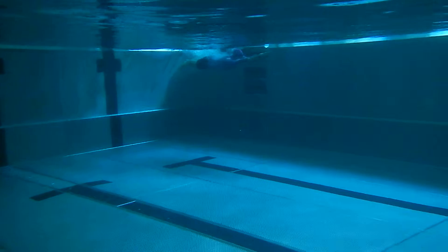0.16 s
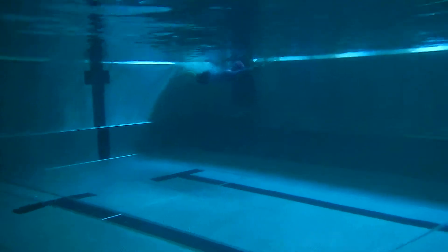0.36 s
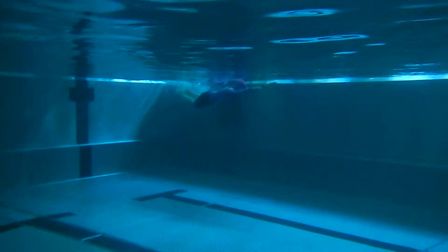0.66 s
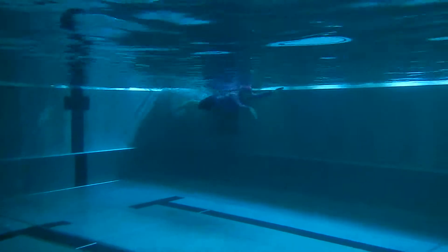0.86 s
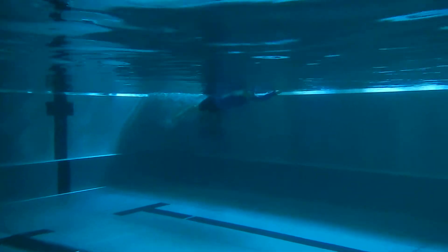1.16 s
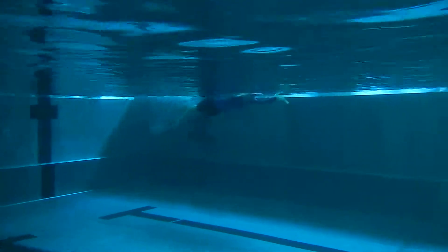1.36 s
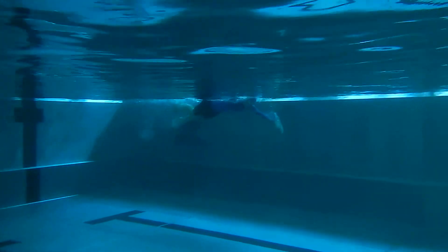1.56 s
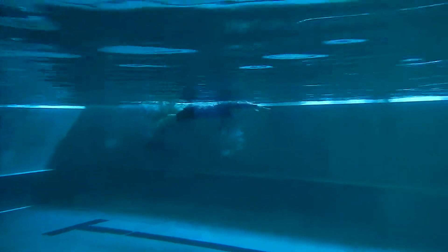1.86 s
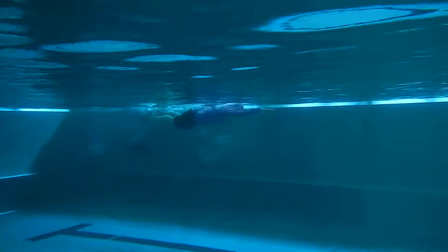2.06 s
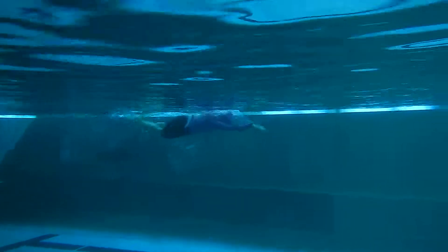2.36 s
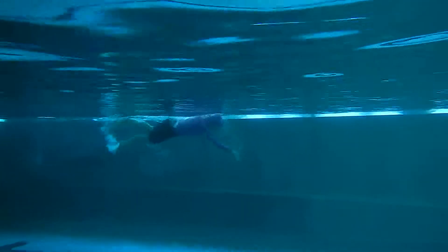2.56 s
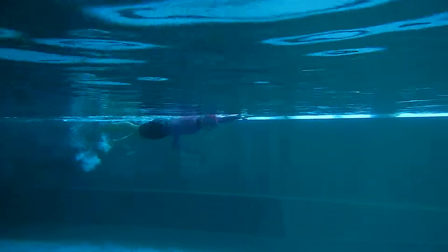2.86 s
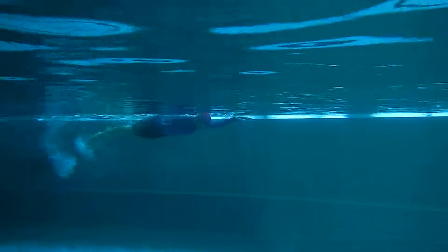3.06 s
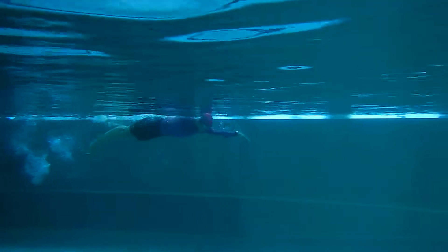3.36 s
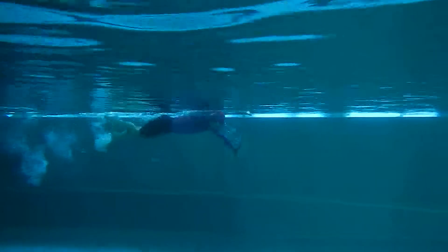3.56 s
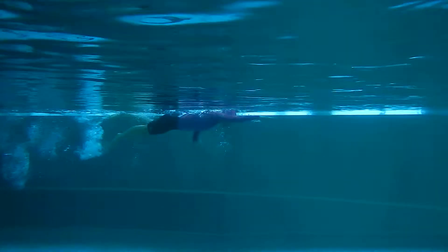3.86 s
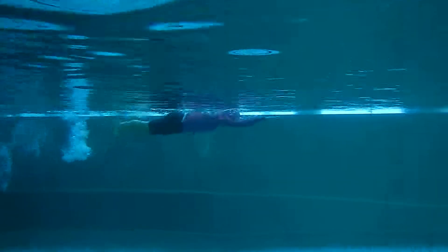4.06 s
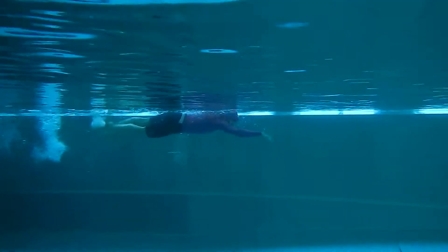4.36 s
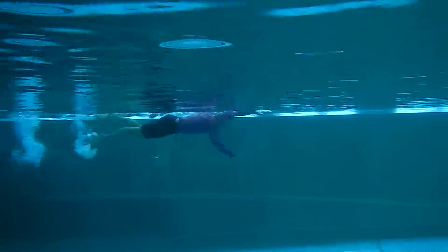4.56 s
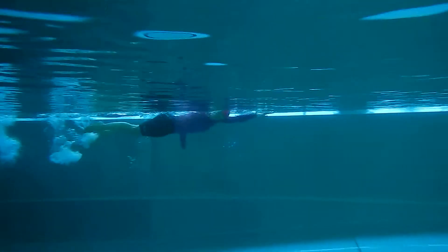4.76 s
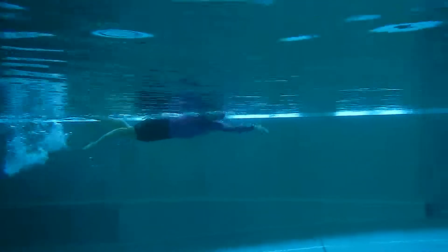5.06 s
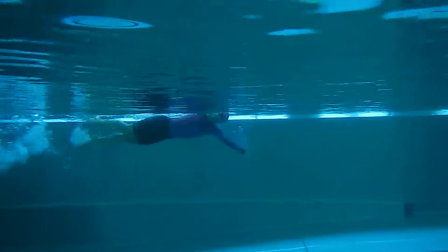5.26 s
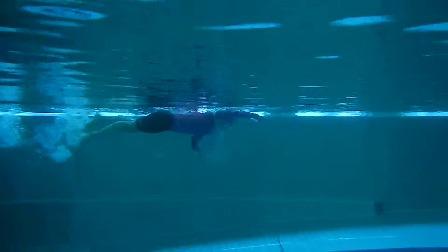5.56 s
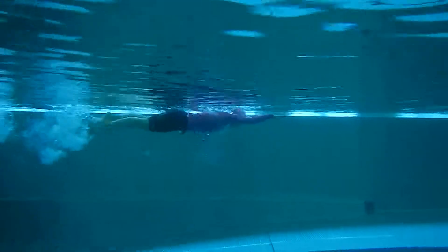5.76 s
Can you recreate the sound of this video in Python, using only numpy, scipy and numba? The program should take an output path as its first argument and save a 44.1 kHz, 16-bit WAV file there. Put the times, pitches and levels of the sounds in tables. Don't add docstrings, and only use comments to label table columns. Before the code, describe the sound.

Heard from underwater in a pool: a swimmer's strokes keep up a muffled, boxy wash of bubbling water that swells and fades. A fluttering bubble burst comes near the start, a harder one around two and a half seconds, and the deepest glugging near five and a half. After each, the wash drops back and slowly recovers. The microphones sit inside a watertight case, with the right side louder.

```python
import sys
import numpy as np
from scipy import signal
from scipy.fft import rfft, irfft, next_fast_len
from scipy.io import wavfile
from scipy.ndimage import uniform_filter1d, minimum_filter1d
from numba import njit

SR = 44100
rng = np.random.default_rng(int(sys.argv[2]) if len(sys.argv) > 2 else 0)


def gain_from_db(level_db):
    decades = np.asarray(level_db, float) / 20
    return 10 ** decades


def inscribe(sig):
    pcm = np.round(np.clip(np.atleast_2d(sig).T, -1, 1) * 32767)
    wavfile.write(sys.argv[1], SR, pcm.astype(np.int16))


N = 260190
HZ = np.fft.rfftfreq(2 * next_fast_len(N // 2 + 4096), 1 / SR) + 1

# start t/s, end t/s, level/dB, sag/(dB/s), deep share/dB
BURSTS = [
    (.36, 0.758, -18.5, -3, -1),
    (2.49, 3.044, -11, 36.5, -1.7),
    (5.44, 6.104, -21.5, -5.5, 4.5),
]


def gurgle():
    # t/s, peak level/dB, f/Hz, length/ms
    small_pops = [(.003, -6, 272, 4.5), (.031, -8, 312, 11.2), (.047, -8.5, 330, 5.9), (.075, -12, 300, 9),
                  (.11, -11.5, 310, 8.6), (.2, -18, 302, 10), (.347, -4.5, 305, 6.1), (.392, -8.5, 327, 11),
                  (.428, -8.5, 310, 5.2), (.453, -3, 357, 13), (.479, -9, 360, 11), (.545, -2.5, 269, 6.4),
                  (.567, 4.3, 328, 6.6), (.606, 4.5, 333, 5), (.647, -10, 255, 5.7), (.658, -6, 255, 2),
                  (.679, -3, 301, 4.5), (.712, -5, 302, 8.2), (.723, -6, 322, 5.3), (.833, -2.5, 325, 6.2),
                  (.907, -1, 364, 3.2), (.983, -1.5, 330.5, 2.06), (1.598, -7.5, 328, 10),
                  (2.485, 8.5, 252.6, 11), (2.501, -2, 288, 9), (2.53, -19, 362, 12),
                   (2.559, -15, 295, 3.9), (2.627, -7.5, 294, 7), (2.642, -5.5, 330, 9.7),
                   (2.664, -5, 310, 2.9), (2.696, -11, 330, 9.4), (2.72, -10.5, 292, 9),
                   (2.752, -5.5, 267.6, 6.2), (2.777, -9, 306, 10), (2.836, -7, 310, 8),
                   (2.859, -2.1, 311, 4.7), (2.882, -4.5, 251, 6.3), (2.909, -9, 334, 9),
                   (2.95, -4.5, 275, 7.8), (2.993, -22.5, 263, 11), (3.021, -19, 317, 8.6),
                   (3.035, -11, 353, 3.2), (3.12, -19, 333, 6), (3.192, -21.5, 310, 4.4),
                  (5.323, -16, 331, 11), (5.432, -1.5, 284, 3.9), (5.451, 0, 345, 21),
                  (5.477, -9.5, 274, 11), (5.534, -7, 312, 5.5), (5.562, -1.5, 277, 7.4),
                  (5.62, -14.5, 307, 8.8), (5.686, 2.5, 310, 10), (5.706, -2, 349.5, 8.1),
                  (5.717, -0.2, 282.4, 5.8), (5.74, -0.5, 265, 4.2), (5.764, 0, 297, 10),
                  (5.783, -4.5, 328, 3.2), (5.795, -2, 324, 10), (5.82, -13, 403, 23),
                  (5.839, -5.5, 271, 5.6), (5.873, -7, 243.5, 6.2), (5.892, -13, 264, 9)]
    # t/s, peak level/dB, f/Hz, length/ms
    glugs = [(.527, -11, 120, 5.8), (.567, -8.5, 127.5, 3.3), (.593, -10.5, 107, 11),
             (.625, -11.5, 106.6, 11), (.658, -9.5, 115.8, 22), (.681, -8, 105, 19), (.713, -15.5, 136, 36),
             (.834, -15.5, 127, 7.1), (.908, -17, 122, 5.2), (2.494, -5.5, 140.5, 18),
             (2.555, -18, 105.6, 9), (2.596, -11, 95.4, 22), (2.648, -9, 95, 27), (2.722, -11.5, 151, 8),
             (2.829, -8, 135.6, 3.9), (2.862, -13.5, 139, 17), (5.427, -8.5, 138.2, 4.4),
             (5.472, 0, 101.7, 3.7), (5.495, 3.5, 88.8, 32), (5.519, -7, 88, 8.1), (5.544, -3, 87.6, 5.6),
             (5.579, -9, 112.4, 27), (5.625, 0.2, 109.2, 7.7), (5.68, -4, 118, 28), (5.743, -9.5, 126, 4.8),
             (5.785, -9.5, 128.2, 28), (5.841, -10, 154.6, 10)]
    small = bubbles(small_pops + patter(count=10), 0.3183, 0.026)
    large = bubbles(glugs, 0.45, 0.023)
    stream_db, deep_db = stream()
    air = colour(churn(3.8, 6.1), 1 / (1 + (HZ / 520) ** 4))
    high = level(colour(air, modes([(310, 83, 0)])), 0)
    deep = level(colour(air, modes([(100, 240, 0)])), 0)
    close = gain_from_db(-1.0) * small + gain_from_db(-0.5) * large
    return close + gain_from_db(stream_db) * (high + gain_from_db(deep_db) * deep)


def patter(count):
    level_db, spread_db = -11.5, 6
    pitch_hz, spread_hz = 310, 15
    length_ms, spread_length_db = 6.0, 3.3
    rows = []
    for start, end, *_ in BURSTS:
        at = rng.random(count)
        a, b, c = rng.standard_normal((count, 3)).T
        s = start + (np.arange(count) + at) / count * (end - start)
        ms = length_ms * gain_from_db(spread_length_db * c)
        rows += list(zip(s, level_db + spread_db * a, pitch_hz + spread_hz * b, ms))
    return rows


def stream():
    onset_s, cut_s, trail_s = 0.051, 0.077, 0.47
    trail_db, quiet_db = -39, -69
    t = np.arange(N) / SR
    level_db, deep_db = np.full(N, float(quiet_db)), np.zeros(N)
    for start, end, db, sag, deep in BURSTS:
        last_db = db - sag * (end - start)
        times = [start - onset_s, start, end, end + cut_s, end + trail_s]
        one = np.interp(t, times, [quiet_db, db, last_db, trail_db, quiet_db])
        deep_db = np.where(one > level_db, deep, deep_db)
        level_db = np.maximum(level_db, one)
    return level_db, deep_db


def blips():
    # t/s, peak level/dB, f/Hz, length/ms
    single = [(1.272, -5.5, 950, 18), (1.53, -4, 923, 9), (1.805, -3.5, 1001, 12), (2.385, -13.5, 641, 27),
              (2.47, -15.5, 1123, 14), (2.583, -19, 862, 8.8), (4.19, -8.5, 613, 16), (4.22, -6, 1000, 18),
              (1.27, -20.5, 100, 20), (4.18, -18, 274, 12), (5.1, -16.5, 114, 23), (5.315, -18, 132.2, 12)]
    return bubbles(single, 0.4, 0.007)


def riser():
    return bubbles([(3.135, -23.5, 593, 30)], 0.35, 0.69)


def wash():
    # f/Hz, level/(dB per Hz)
    wall_curve = [(15, -37.5), (30, 2), (120, -7.5), (230, -9.5), (450, -8.5), (800, 6.5), (1250, 3.5),
                  (2000, -7), (2900, -8.5), (3600, -22.5), (5300, -33), (7000, -42), (9000, -44),
                  (15800, -57.5)]
    # f/Hz, width/Hz, level/dB
    case_peaks_and_dips = [(330, 155, 12.5), (1428, 74, 3), (1309, 76, -5), (2976, 800, -5),
                           (2480, 70, -14), (3190, 110, -20), (4480, 160, -9), (5000, 70, -11)]
    # f/Hz, width/Hz, level/dB
    upper_mode = [(902, 62.5, 6.5), (1000, 219, 11.5)]
    lower_mode = [(588, 189, -2), (673, 45, -5.5)]

    shape_db = over_hz(wall_curve, 1)
    for hz, width, db in case_peaks_and_dips:
        shape_db = shape_db + db / (1 + (2 * (HZ - hz) / width) ** 2)
    band = (HZ > 1700) & (HZ < 3000)
    wall = gain_from_db(shape_db) / np.sqrt(np.sum(gain_from_db(shape_db[band]) ** 2) / len(HZ))

    low = 1 / (1 + (HZ / 450) ** 6)
    water = churn(0.6, 1.5)
    rumble = level(colour(churn(0.31, 2.54), wall * np.sqrt(low)), 2.52)
    hiss = colour(water, wall * np.sqrt(1 - low))

    far = swarm(count=1500, low_hz=493, high_hz=1223, cycles=4.037, scatter_db=2.0)
    drive = water + gain_from_db(-14.0) * far
    upper_db, lower_db = modes_db()
    upper = level(colour(drive, modes(upper_mode)), -3.0) * gain_from_db(upper_db)
    lower = level(colour(drive, modes(lower_mode)), -4.0) * gain_from_db(lower_db)
    return gain_from_db(wash_db() + 7.0) * (hiss + upper + lower + gain_from_db(1.5) * rumble)


def modes_db():
    # t/s, half length/s, upper mode level/dB, lower mode level/dB
    clouds = [(0.367, .12, 3, 12), (0.696, 0.091, 3.5, 11), (0.897, 0.19, 2.5, 7.5), (1.095, .14, 3.5, -3),
              (1.526, 0.14, 2.5, 6), (1.839, 0.026, 0.5, 5), (2.043, 0.14, -2, 7), (2.396, .07, 4.5, 16.5),
              (2.928, 0.36, 7.5, 13.5), (3.343, .22, 7, 7), (3.925, 0.39, 3.5, 6.5), (4.383, 0.35, 5, 6),
              (5.14, 0.28, 2.5, 5.5), (5.35, 0.056, 2.5, 3.5)]
    t = np.arange(N) / SR
    upper_db = 11.5
    lower_db = 3.0 + 0.63 * t
    for s, half, upper_lift, lower_lift in clouds:
        swell = np.maximum(0, 1 - np.abs(t - s) / half)
        upper_db = upper_db + upper_lift * swell
        lower_db = lower_db + lower_lift * swell
    return upper_db, lower_db


def wash_db():
    # t/s, level/dB
    effort = [(0, -35), (.6, -35.5), (1.17, -34.5), (1.27, -30), (1.33, -32.5), (1.85, -35.5), (2.0, -33.5),
              (2.3, -35), (2.42, -37.5), (3.06, -32.5), (3.12, -35.5), (3.42, -33), (3.58, -36),
              (3.99, -31), (4.3, -37), (5.09, -34), (5.36, -35.5), (5.9, -36.5)]
    # t/s, depth/dB, fall/s, hold/s
    ducks = [
        (0.286, 10, .6, .01),
        (2.484, 19.5, .03, .5),
        (5.426, 11, .03, .3),
        (5.448, 20, .08, .4),
        (5.815, 27.5, .06, .01),
    ]
    recover_db_per_s = 13.5
    t = np.arange(N) / SR
    duck_db = np.zeros(N)
    for s, db, fall, hold in ducks:
        times = np.cumsum([0, fall, hold, db / recover_db_per_s])
        duck_db = np.maximum(duck_db, np.interp(t - s, times, [0, db, db, 0]))
    s, db = np.transpose(effort)
    return np.interp(t, s, db) - duck_db


def churn(flicker_db, grain_db):
    level_db = flicker_db * walk(9) + grain_db * walk(70)
    return level(rng.standard_normal(N) * gain_from_db(level_db), 0)


def swarm(count, low_hz, high_hz, cycles, scatter_db):
    moment, size, strength = rng.random((count, 3)).T
    hz = low_hz * (high_hz / low_hz) ** size
    db = -scatter_db * np.log(strength + 1e-9)
    table = np.transpose([moment * N / SR, db, hz, 1000 * cycles / hz])
    return level(bubbles(table, 0.2923, 0.0093), 0)


def port_flow():
    return level(colour(rng.standard_normal(N), modes([(60, 120, 0)])), -16.0) * gain_from_db(wash_db())


def line_whine():
    return gain_from_db(wash_db() - 59.0) * np.sin(2 * np.pi * 15734 * np.arange(N) / SR)


def left_of(right, own):
    # f/Hz, gain level/dB, incoherent share/1
    left_curve = [(30, -8, 1), (187, -11.5, 0.09), (330, -15.5, 0.1), (436, -37.5, 0.9), (496, -18.5, .05),
                  (890, -6.5, 0.8), (1000, -10.5, 0), (1300, -7.5, 0.85), (1310, -8, 0.3), (2780, -5.5, 0),
                  (3800, -0.8, 0.9), (4800, -1.5, 1), (8400, -4, 1), (12700, -8.5, 1)]
    # f/Hz, phase/rad
    lead_curve = [(30, -.1), (200, -.1), (330, -.8), (450, 1.1), (720, 1.6), (850, 1.2), (1130, 2.3),
                  (1320, .5), (1450, 1.4), (1800, 1.8), (2500, 1.4), (4200, 1.6), (9000, 1.2)]
    gain = gain_from_db(over_hz(left_curve, 1))
    share = np.clip(over_hz(left_curve, 2), 0, 1)
    shift = np.exp(1j * over_hz(lead_curve, 1))
    return colour(right, gain * np.sqrt(1 - share) * shift) + colour(own, gain * np.sqrt(share))


def bubbles(table, rise, glide):
    s, db, hz, ms = (np.ascontiguousarray(c, float) for c in np.transpose(table))
    phase = 2 * np.pi * rng.random(len(s))
    return ring(np.zeros(N), s * SR, gain_from_db(db), hz, ms * SR / 1000, phase, rise, glide)


@njit
def ring(out, at, gain, hz, length, phase, rise, glide):
    out = out.copy()
    for e in range(len(at)):
        p, span = phase[e], length[e]
        for i in range(int(-3 * rise * span), int(5 * span)):
            u = i / span
            p += 2 * np.pi * hz[e] * (1 + glide * u) / SR
            shape = np.exp(-.5 * (u / rise) ** 2) if u < 0 else 1 / np.cosh(2.2 * u)
            n = int(at[e]) + i
            if 0 <= n < len(out):
                out[n] += gain[e] * shape * np.sin(p)
    return out


def modes(table):
    return sum(gain_from_db(db) / (1 + 1j * (HZ - hz * hz / HZ) / width) ** 2 for hz, width, db in table)


def colour(x, gain):
    pad = len(HZ) - 1 - N // 2
    fade = np.minimum(1, (1 - np.abs(np.linspace(-1, 1, N + 2 * pad))) * N / pad / 2)
    return irfft(rfft(np.pad(x, pad, "reflect") * fade) * gain)[pad:-pad]


def over_hz(table, column):
    table = np.array(table)
    return np.interp(np.log(HZ), np.log(table[:, 0]), table[:, column])


def walk(rate):
    k = int(SR / rate)
    steps = np.repeat(rng.standard_normal(N // k + 1), k)
    return 1.3 * uniform_filter1d(uniform_filter1d(steps, k), k)[:N]


def level(x, db):
    return x * gain_from_db(db) / np.sqrt(np.mean(x ** 2))


def overload(dry):
    # t/s, peak level/dB
    tip_table = [(0.548, -56.5), (.711, -61), (.831, -52), (2.479, -38), (2.639, -49.5), (2.859, -48.5),
                 (2.95, -62), (3.035, -63), (5.447, -52), (5.452, -47.5), (5.487, -54), (5.498, -41.5),
                 (5.5078, -45), (5.684, -41.5), (5.697, -49.5), (5.791, -52.5), (5.899, -55)]
    s, db = np.transpose(tip_table)
    at = np.clip((s * SR).astype(int), 0, N - 1)
    spikes = np.zeros(N)
    spikes[at] = gain_from_db(db + 62.0) * np.sign(dry[1, at])
    tips = colour(spikes, 1 / (1 + (HZ / 700) ** 2))
    return np.array([gain_from_db(-9.5) * tips, tips])


def limiter(x):
    room_left = np.minimum(1, 0.95 / (np.abs(x).max(axis=0) + 1e-9))
    return x * uniform_filter1d(minimum_filter1d(room_left, size=601), size=601)


def scene():
    right = gurgle() + blips() + riser() + wash()
    left = left_of(right, own=wash()) + port_flow()
    return np.array([left, right])


def low_pass(x):
    return signal.sosfilt(signal.butter(12, 15750, fs=SR, output="sos"), x)


def record(dry):
    limited = limiter(dry + overload(dry))
    return low_pass(limited + line_whine())


dry = scene()
out = record(dry)
inscribe(out)
```